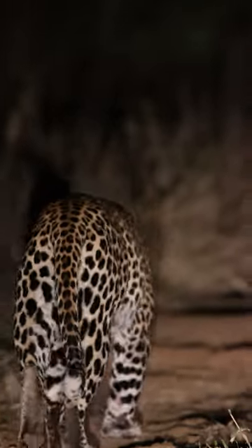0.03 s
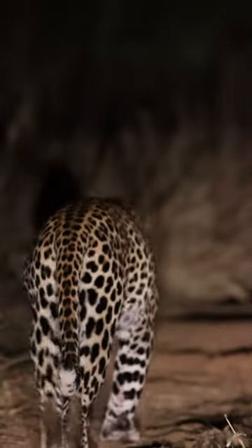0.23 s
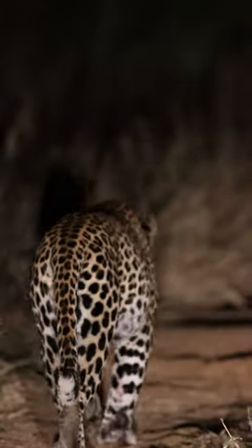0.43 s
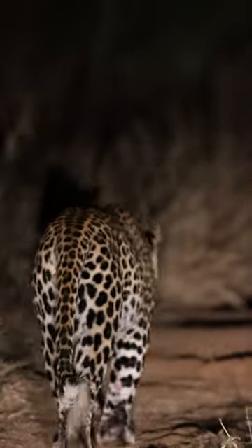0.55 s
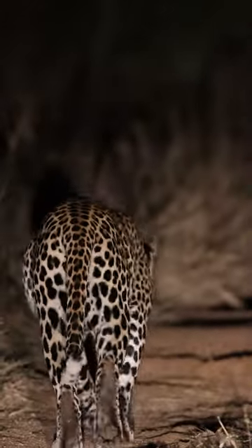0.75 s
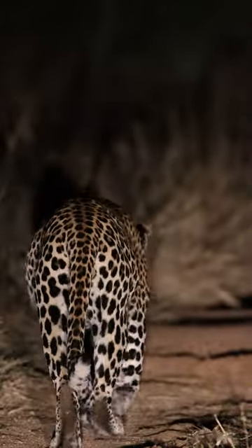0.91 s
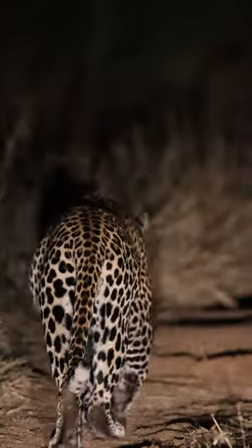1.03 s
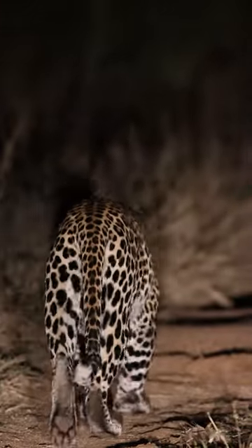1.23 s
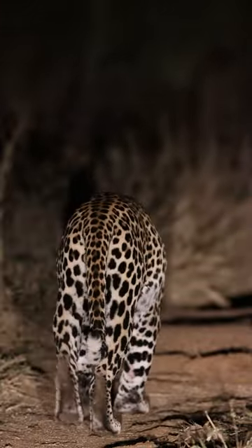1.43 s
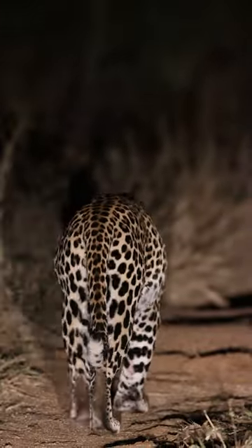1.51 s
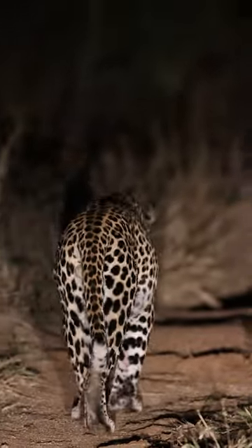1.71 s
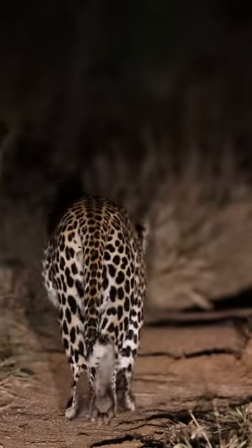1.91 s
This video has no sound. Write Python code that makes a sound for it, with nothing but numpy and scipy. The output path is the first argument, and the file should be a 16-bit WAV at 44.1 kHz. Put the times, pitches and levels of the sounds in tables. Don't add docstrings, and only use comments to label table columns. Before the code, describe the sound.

A leopard's deep sawing call, three hoarse rasps with soft in-breath rattles, in quiet night bush

```python
import sys
import numpy as np
from scipy import signal
from scipy.fft import rfft, irfft
from scipy.io import wavfile
from scipy.ndimage import uniform_filter1d

SR = 44100
rng = np.random.default_rng(int(sys.argv[2]) if len(sys.argv) > 2 else 0)


def unload_audio(sound):
    columns = np.transpose(np.atleast_2d(sound))
    steps = np.round(np.clip(columns, -1, 1) * 32767)
    wavfile.write(sys.argv[1], SR, steps.astype(np.int16))


def magnitude_from_level(level_db):
    exponent = np.asarray(level_db, float) / 20
    return 10 ** exponent


N = 85995

# (time [s], effort [dB], low tone [Hz])
RASP_CURVES = [
    [(.222, -25, 185.6), (.247, -13, 186.4), (.27, -15, 195.8), (.3, -13, 195), (.355, -12.5, 181.9),
     (.378, -21, 182), (.4, -24.5, 171.3), (.465, -31, 156), (.5, -43, 160)],
    [(.879, -29, 194.6), (.915, -20.5, 194.4), (.946, -17.5, 192), (.968, -12.5, 189.6), (1.01, -18, 177),
     (1.035, -24, 159), (1.065, -29, 159), (1.1, -30, 166), (1.14, -61, 156)],
    [(1.514, -30, 161), (1.54, -19, 175), (1.585, -14, 199.8), (1.62, -15.5, 178.4), (1.652, -15.5, 183.7),
     (1.676, -20, 163), (1.7, -27.5, 175), (1.77, -33.5, 150), (1.8, -47, 146)],
]
# (time [s], flap rate [1/s])
RASP_FLAPS = [
    [(.222, 39), (.247, 43), (.27, 46), (.3, 49), (.355, 47.5), (.378, 42), (.4, 32), (.465, 30)],
    [(.879, 62), (.93, 59), (.95, 50), (.968, 48), (1.01, 45), (1.035, 39), (1.065, 38), (1.1, 50)],
    [(1.514, 39), (1.54, 41), (1.585, 46.5), (1.62, 47), (1.652, 43.5), (1.676, 41), (1.7, 36), (1.77, 23)],
]
MOUTH_OPENING = [0.94, 0.92, 0.983]
# (start [s], length [s], first flap rate [1/s], speed-up [1/s2])
RATTLES = [
    (.012, .16, 45, 76),
    (.66, .158, 42, 130),
    (1.32, .135, 44, 100),
]
RATTLE_EFFORT = [-21.5, -21.5, -20.5]
# (frequency [Hz], width [Hz], level [dB])
RASP_THROAT = [(293.6, 76.4, -9.5), (556, 79.3, -8), (672.5, 134.5, -2), (866.4, 79, -15.5),
               (1244, 185, -15), (1602, 320, -18.5), (1935, 330, -23.5), (2320, 250, -29.5),
               (3750, 1300, -33.5), (6000, 7800, -46.5)]
# (frequency [Hz], width [Hz], level [dB])
RATTLE_THROAT = [(272, 54, -6.5), (570, 90, -10.5), (741, 110, -18.5), (1430, 610, -28), (1730, 130, -28.5),
                 (2450, 600, -27.5), (3620, 1400, -34.5)]
# (frequency [Hz], time to fall 60 dB [s])
ECHO_DECAY = [(100, 3.3), (190, 1.66), (350, 1.1), (600, 1.8), (1700, 3), (5000, 0.17)]
# (frequency [Hz], density [dB per Hz])
HISS_SPECTRUM = [(25, -21.5), (60, 5.5), (105, 17), (300, -16), (1500, 7.5), (4000, 2), (9000, 0.5),
                 (16000, -4)]
# (frequency [Hz], side over mid [dB])
HISS_SIDE = [(30, -18.5), (150, -6.5), (500, -3), (1500, -27), (4000, -15.5), (8000, -15), (14000, -12.5)]

TENSE_DB, SLACK_DB = -19, -25
JITTER, SHIMMER_DB = .01, 1.2
FLAP_S, FLAP_RISE_S = .00045, .00076
TENSE_WIDTH_HZ, RASP_SLACK_WIDTH_HZ, RATTLE_SLACK_WIDTH_HZ = 12.4, 19, 30
QUENCH = 2
BRIGHTEN = .29
CLICK_DULL_HZ, FLAP_SPREAD = 1500, 1.4
LOW_CUT_HZ = 120
RASP_AIR_DB, RATTLE_AIR_DB, LOW_AIR_DB = -10, -11, 14
PUFF_FADE, PUFF_STEADY = .3, .35
SIGH_DB, SIGH_LAG_S, SIGH_PUFF = 7.5, .035, 1.6
THUMP_DB, THUMP_HZ, THUMP_EFFORT = -52, 75.6, .067
RATTLE_HZ, WEAK_FLAP_DB = 152.4, -8
RATTLE_PEAK, RATTLE_EDGE_DB = .6, -8
ECHO_DB, ECHO_GAP_S, CYCLE_S = -27, .03, .655
CRICKET_HZ, CRICKET_WIDTH_HZ, CRICKET_DB = 7860, 320, -74.5
CRICKET_RATE, CRICKET_START_S, CRICKET_END_S = 25.2, .25, 1.78
HISS_DB = -58.5


def rasp(curve, flap_curve, opening):
    time, effort_db, low_hz = np.transpose(curve)
    t = np.arange(flap_curve[0][0], time[-1], 1 / SR)
    rate = np.interp(t, *np.transpose(flap_curve))
    throat = [(hz * opening, width, db) for hz, width, db in RASP_THROAT]
    return breath(t[0], rate, np.interp(t, time, effort_db), np.interp(t, time, low_hz),
                  RASP_SLACK_WIDTH_HZ, throat, RASP_AIR_DB, 0)


def rattle(start, length, rate, speedup, effort_db):
    t = np.arange(0, length, 1 / SR)
    swell_db = np.interp(t / length, [0, RATTLE_PEAK, 1], [RATTLE_EDGE_DB, 0, RATTLE_EDGE_DB * 0.63])
    return breath(start, rate + speedup * t, effort_db + swell_db, np.full(len(t), RATTLE_HZ),
                  RATTLE_SLACK_WIDTH_HZ, RATTLE_THROAT, RATTLE_AIR_DB, WEAK_FLAP_DB)


def breath(start, rate, effort_db, low_hz, slack_width, throat, air_db, weak_db):
    turns = np.cumsum(rate) / SR
    flaps, size = fold_flaps(turns, rate, effort_db, weak_db)
    effort = hold_end(effort_db)
    tense = np.clip((effort - SLACK_DB) / (TENSE_DB - SLACK_DB), 0, 1)
    bright = magnitude_from_level(BRIGHTEN * (effort - TENSE_DB))
    blowing = np.arange(len(effort)) < len(rate)

    flow = blowing * magnitude_from_level(effort + air_db)
    puffs, sigh = throat_air(flow, turns)
    out = low_ring(flaps, size, tense, hold_end(low_hz), slack_width)
    out += resonate(puffs, low_hz.mean(), 54) * magnitude_from_level(LOW_AIR_DB)
    out += upper_throat(flaps, size, bright, puffs, sigh, throat)
    low_cut = signal.butter(4, LOW_CUT_HZ, "high", fs=SR, output="sos")
    out = signal.sosfilt(low_cut, out) + thump(blowing, effort)
    return np.r_[np.zeros(round(start * SR)), out, np.zeros(N)][:N]


def fold_flaps(turns, rate, effort_db, weak_db):
    flaps = np.r_[0, np.flatnonzero(np.diff(np.floor(turns))) + 1]
    luck = rng.standard_normal((14, 2))[:len(flaps)]
    late = (JITTER * luck[:, 0] * SR / rate[flaps]).astype(int)
    flaps = np.clip(flaps + late, 0, len(rate) - 1)
    weak = np.arange(len(flaps)) % 2 == 0
    return flaps, magnitude_from_level(effort_db[flaps] + SHIMMER_DB * luck[:, 1] + weak_db * weak)


def low_ring(flaps, size, tense, low_hz, slack_width):
    t = np.arange(len(tense)) / SR
    phase = 2 * np.pi * np.cumsum(low_hz) / SR
    width = slack_width + (TENSE_WIDTH_HZ - slack_width) * tense
    loss = np.cumsum(np.pi * width / SR - QUENCH * np.minimum(np.gradient(tense), 0))
    ring = np.zeros(len(t))
    for at, strength in zip(flaps, size):
        slip = (1 - tense[at]) * np.angle(np.exp(1j * phase[at]))
        rise = 1 - np.exp(-(t[at:] - t[at]) / FLAP_RISE_S)
        decay = np.exp(loss[at] - loss[at:])
        ring[at:] -= strength * rise * decay * np.sin(phase[at:] - slip)
    return ring


def throat_air(flow, turns):
    noise = rng.standard_normal((2, len(flow)))
    puffs = flow * hold_end(PUFF_STEADY + np.exp(-(turns % 1) / PUFF_FADE)) * noise[0]
    keep = np.exp(-1 / (SIGH_LAG_S * SR))
    sigh = magnitude_from_level(SIGH_DB) * signal.lfilter([1 - keep], [1, -keep], flow) * noise[1]
    return puffs, sigh


def upper_throat(flaps, size, bright, puffs, sigh, throat):
    clicks = np.zeros(len(bright))
    clicks[flaps] = -size * bright[flaps]
    soft = np.hanning(round(FLAP_S * SR))
    clicks = np.convolve(clicks, soft / soft.sum())[:len(bright)]
    open_air = sigh + SIGH_PUFF * magnitude_from_level(SIGH_DB) * puffs
    out = np.zeros(len(bright))
    for hz, width, db in throat:
        dull = 1 / (1 + (hz / CLICK_DULL_HZ) ** 4)
        air = dull * bright * puffs + (1 - dull) * open_air
        flap_ring = resonate(dull * clicks * SR / (2.88 * width), hz, FLAP_SPREAD * width)
        air_ring = resonate(air * np.sqrt(SR / (8 * width)), hz, width)
        out += magnitude_from_level(db) * (flap_ring + air_ring)
    return out


def thump(blowing, effort):
    level = magnitude_from_level(THUMP_DB + THUMP_EFFORT * (effort - SLACK_DB))
    rumble = uniform_filter1d(1. * blowing, 1500) * level * rng.standard_normal(len(effort))
    return resonate(rumble, THUMP_HZ, 60) * np.sqrt(SR / 60)


def hold_end(curve):
    return np.r_[curve, np.full(4000, curve[-1])]


def resonate(x, hz, width):
    b, a = signal.iirpeak(hz, hz / width, SR)
    return signal.lfilter(b, a, signal.lfilter(b, a, x))


def read(points, hz):
    f, value = np.transpose(points)
    return np.interp(np.log(hz + 1), np.log(f + 1), value)


def bush(voice):
    hz, t, z = signal.stft(rng.standard_normal(SR), SR, nperseg=512)
    fade = magnitude_from_level(-60 * t / read(ECHO_DECAY, hz)[:, None])
    tail = signal.istft(z * fade, SR, nperseg=512)[1]
    tail = np.r_[np.zeros(round(ECHO_GAP_S * SR)), tail / np.linalg.norm(tail)]
    lead = round(CYCLE_S * SR)
    echo = signal.fftconvolve(np.r_[voice[:lead], voice], tail)
    return magnitude_from_level(ECHO_DB) * echo[lead:lead + N]


def cricket():
    t = np.arange(N) / SR
    singing = (t > CRICKET_START_S) * (t < CRICKET_END_S)
    throb = np.exp(-(t * CRICKET_RATE % 1) / 0.089) * singing
    sway = magnitude_from_level(2.9 * np.sin(2 * np.pi * 1.1 * t + 3))
    song = resonate(rng.standard_normal(N), CRICKET_HZ, CRICKET_WIDTH_HZ) * throb * sway
    return magnitude_from_level(CRICKET_DB) * song / song.std()


def hiss():
    hz = np.fft.rfftfreq(N, 1 / SR)
    mid, side = rfft(rng.standard_normal((2, N))) * magnitude_from_level(read(HISS_SPECTRUM, hz))
    mid = irfft(mid, N)
    side = irfft(side * magnitude_from_level(read(HISS_SIDE, hz)), N)
    return magnitude_from_level(HISS_DB) / mid.std() * np.array([mid + side, mid - side])


def scene():
    rasps = sum(rasp(*r) for r in zip(RASP_CURVES, RASP_FLAPS, MOUTH_OPENING))
    rattles = sum(rattle(*r, db) for r, db in zip(RATTLES, RATTLE_EFFORT))
    voice = rasps + rattles
    return voice + bush(voice) + cricket() + hiss()


def top_cut(x):
    return signal.sosfilt(signal.butter(12, 15910, fs=SR, output="sos"), x)


def record(dry):
    return top_cut(dry)


dry = scene()
out = record(dry)
unload_audio(out)
```